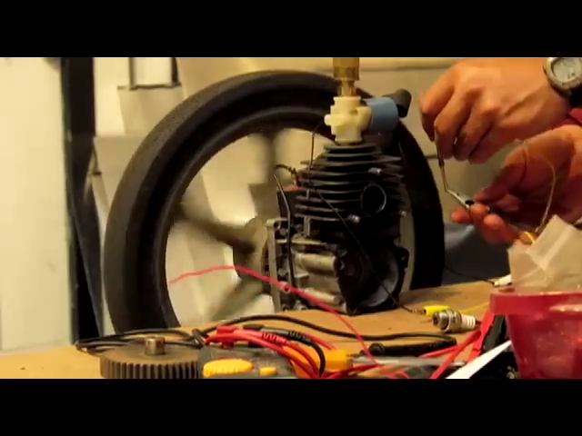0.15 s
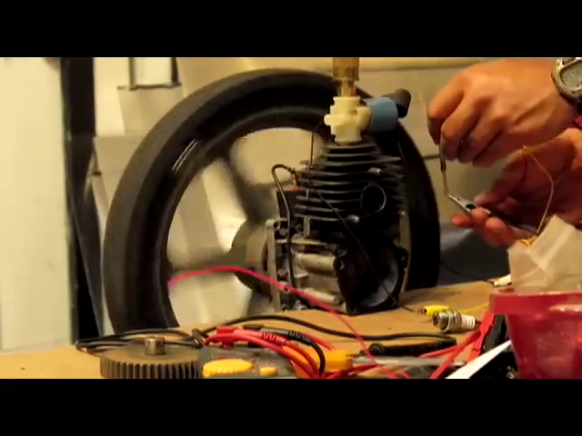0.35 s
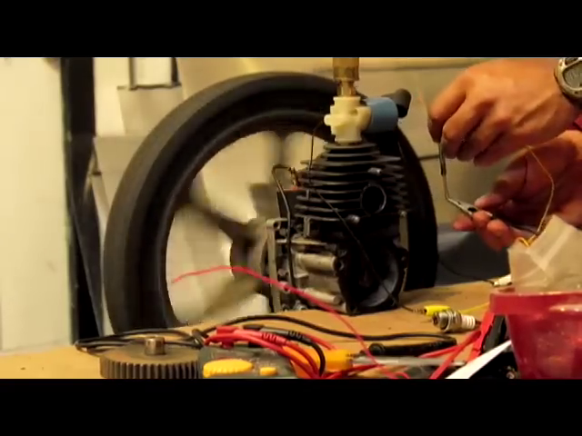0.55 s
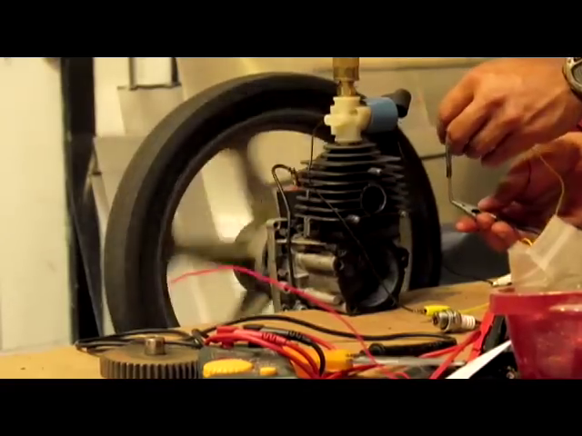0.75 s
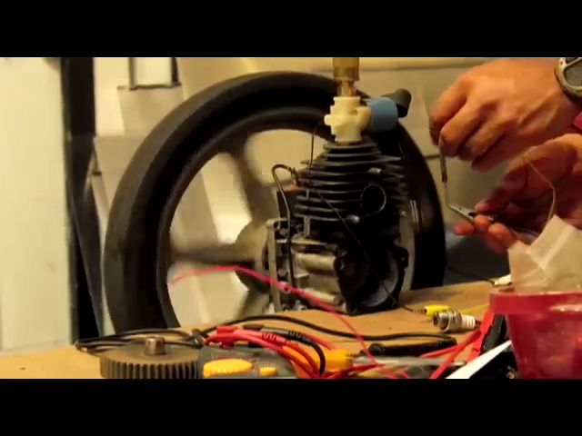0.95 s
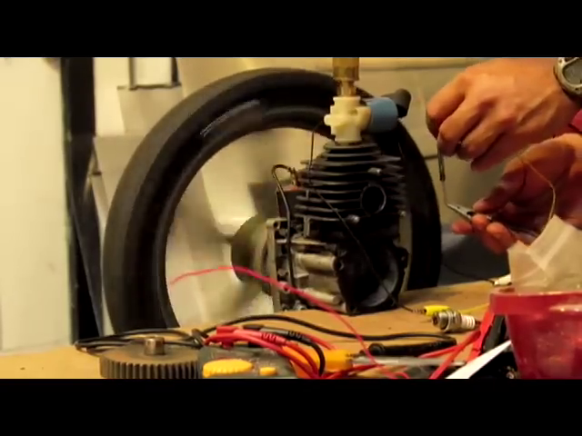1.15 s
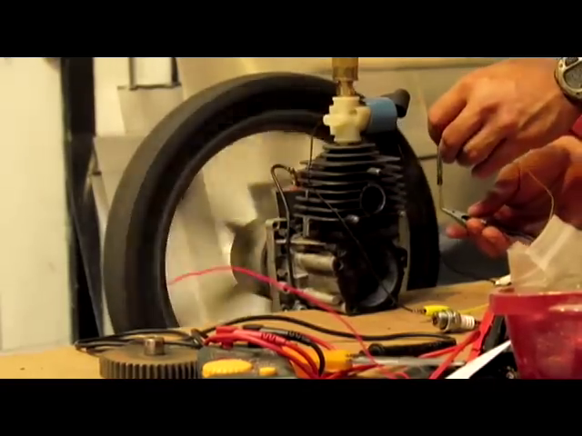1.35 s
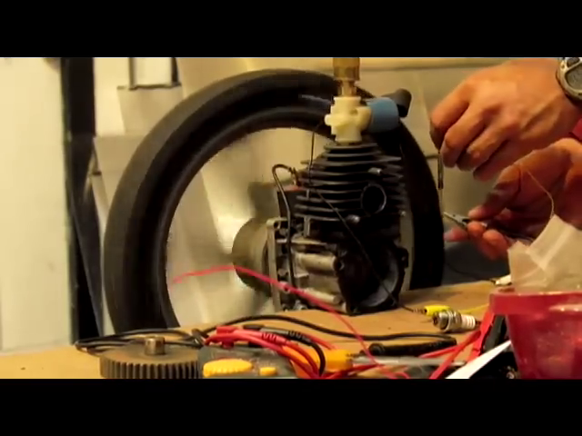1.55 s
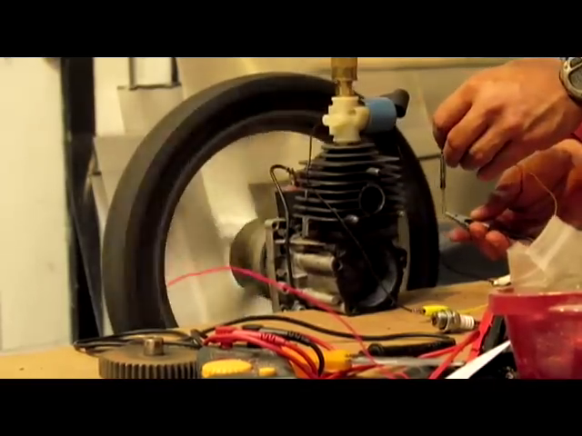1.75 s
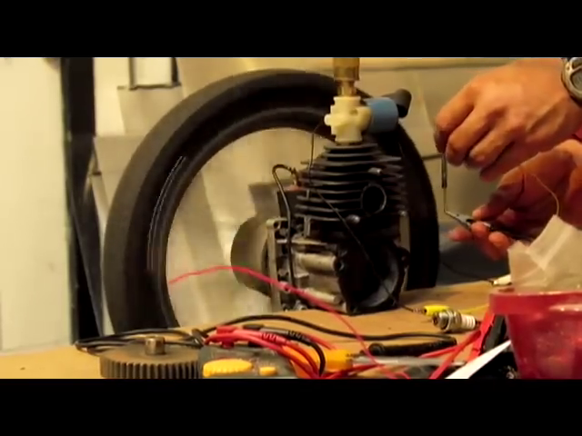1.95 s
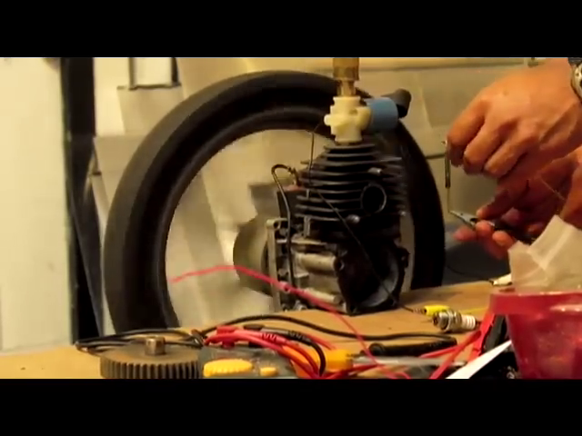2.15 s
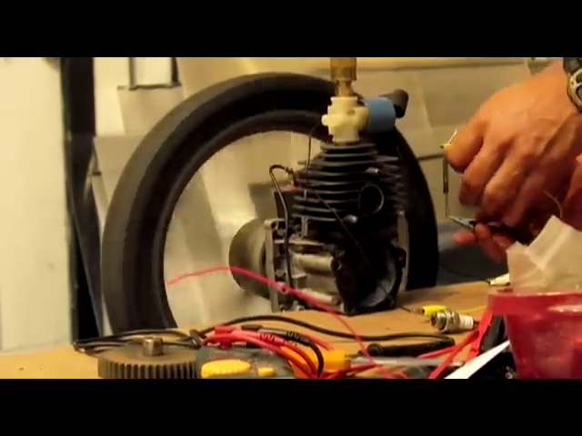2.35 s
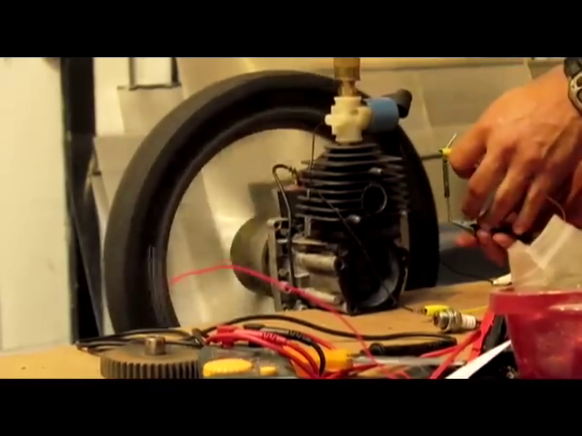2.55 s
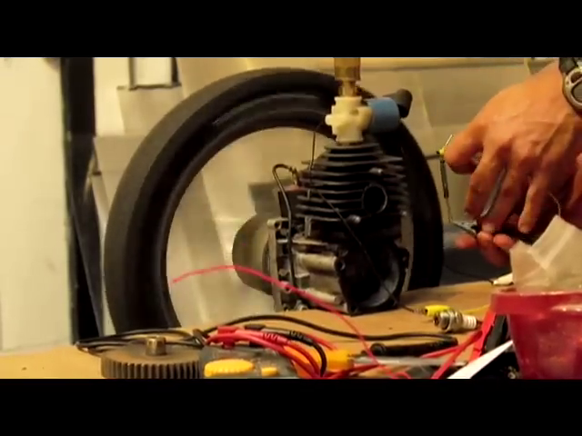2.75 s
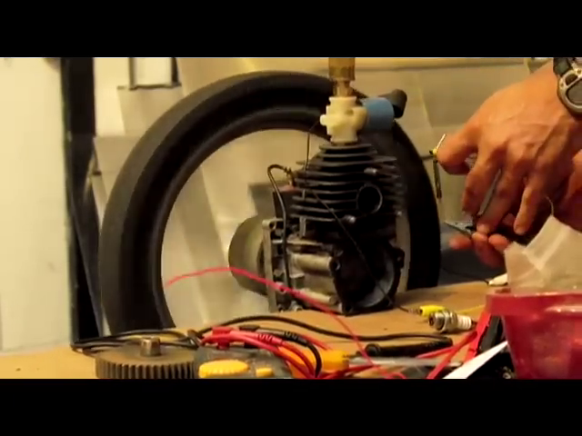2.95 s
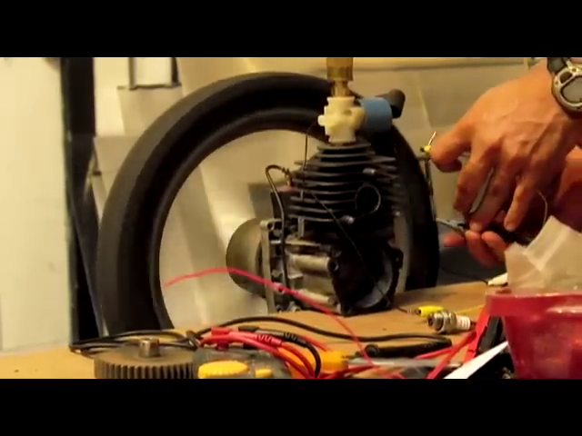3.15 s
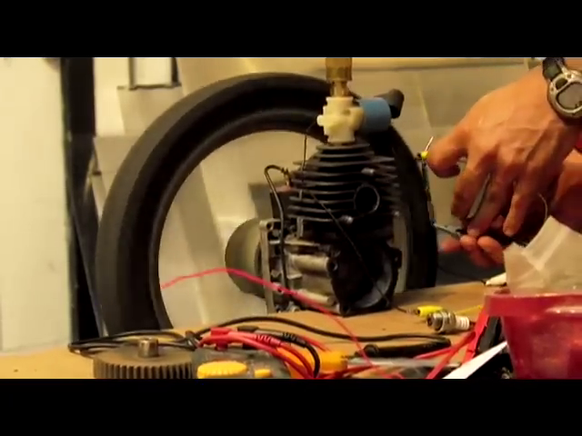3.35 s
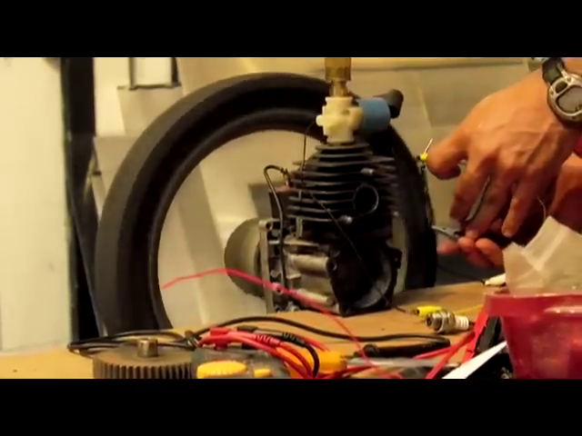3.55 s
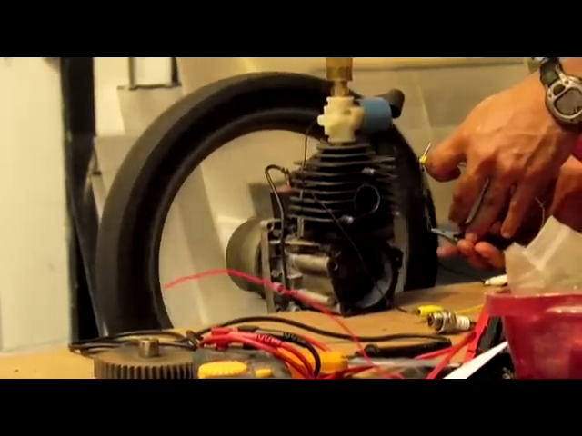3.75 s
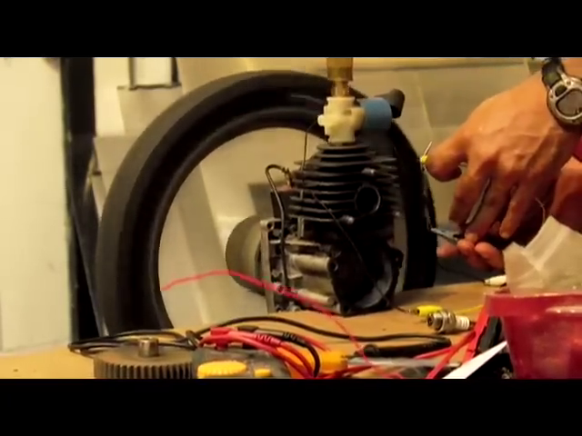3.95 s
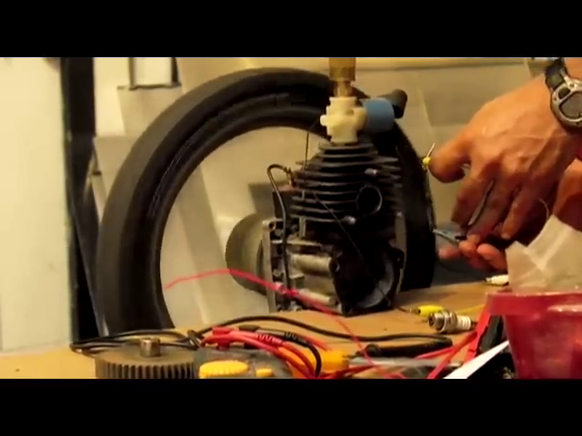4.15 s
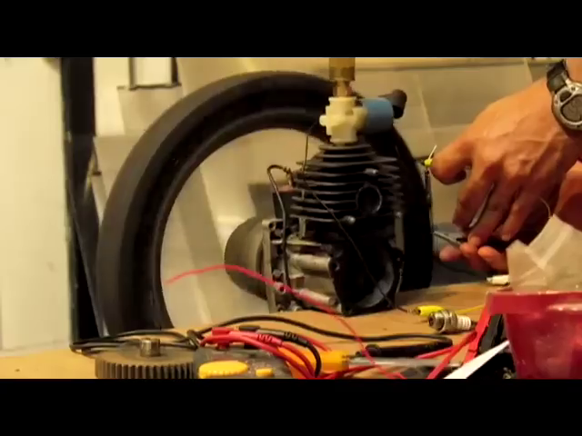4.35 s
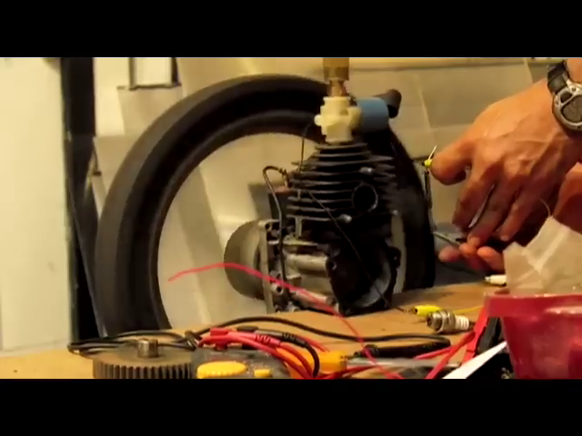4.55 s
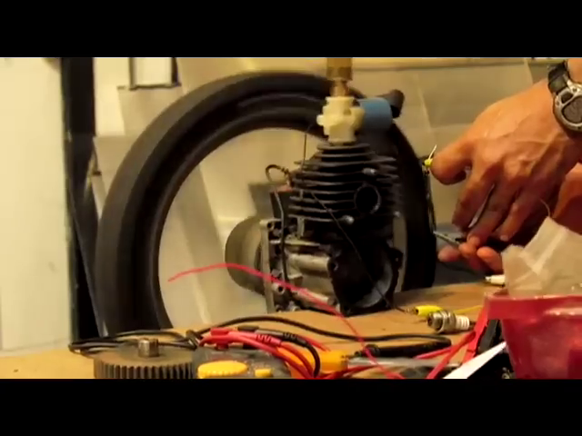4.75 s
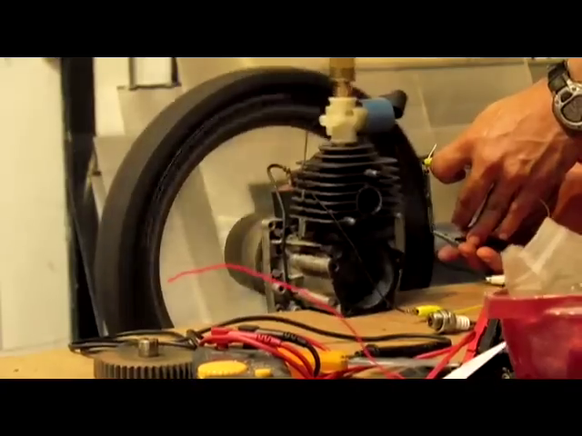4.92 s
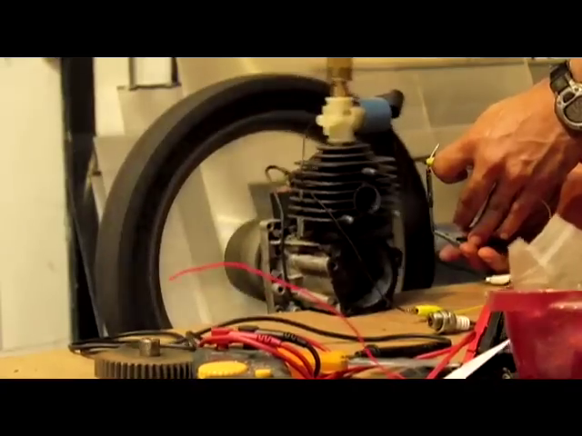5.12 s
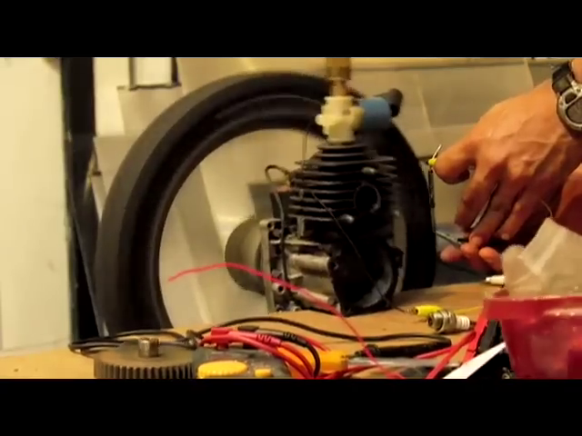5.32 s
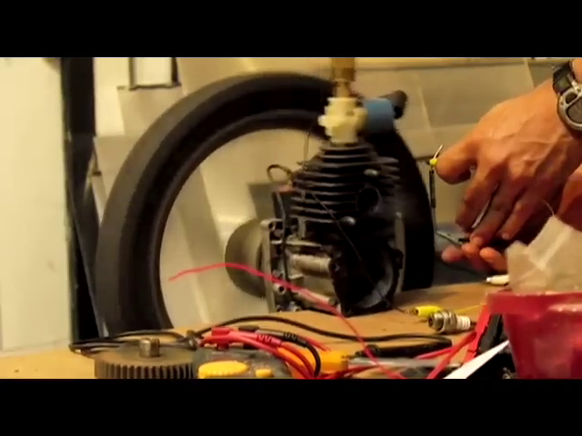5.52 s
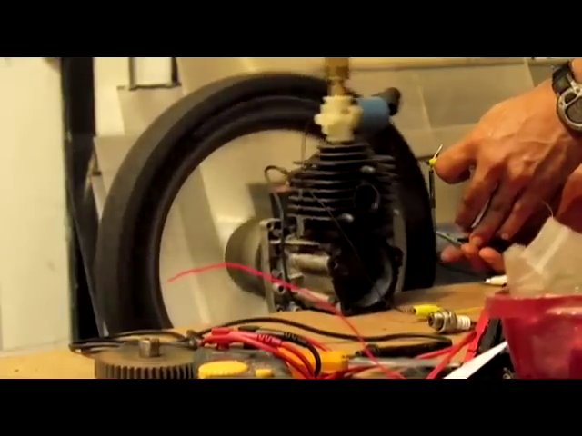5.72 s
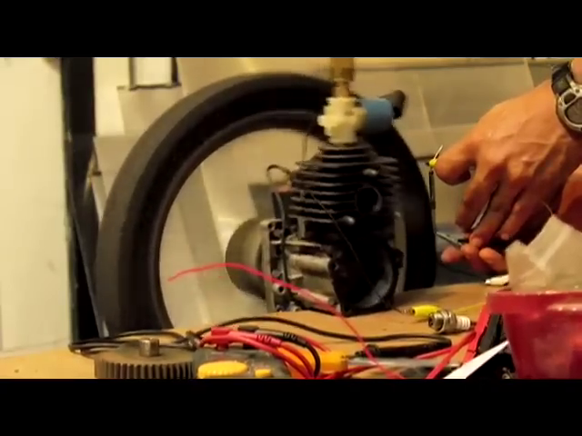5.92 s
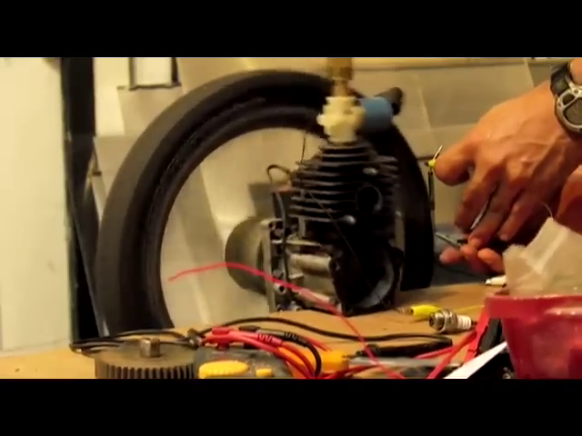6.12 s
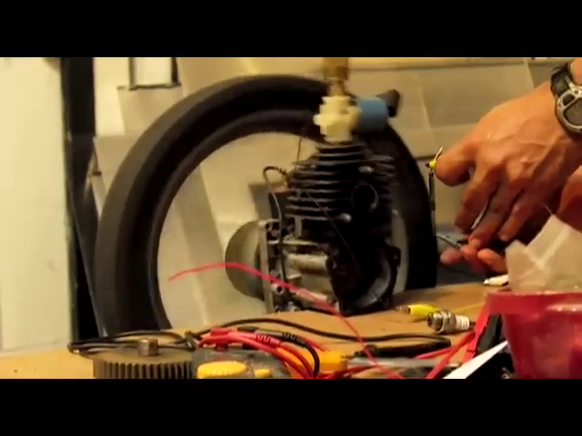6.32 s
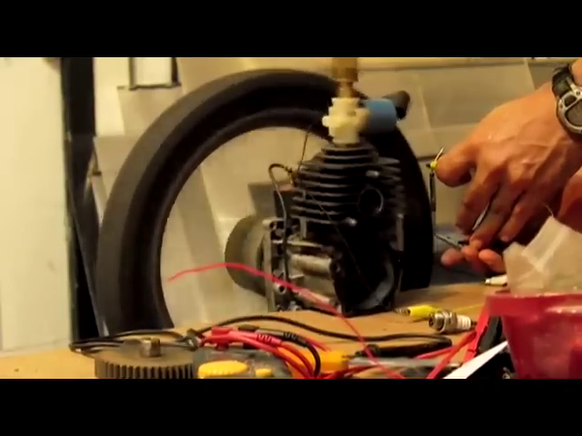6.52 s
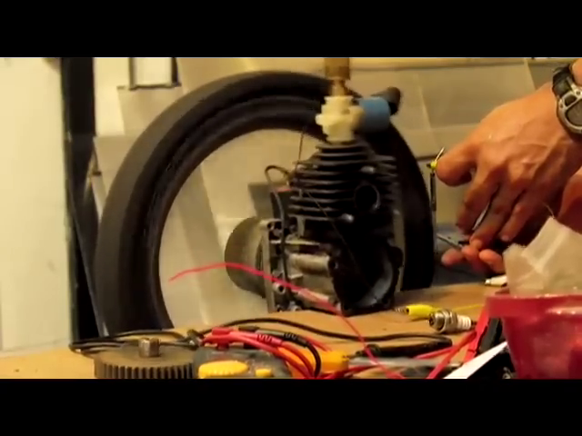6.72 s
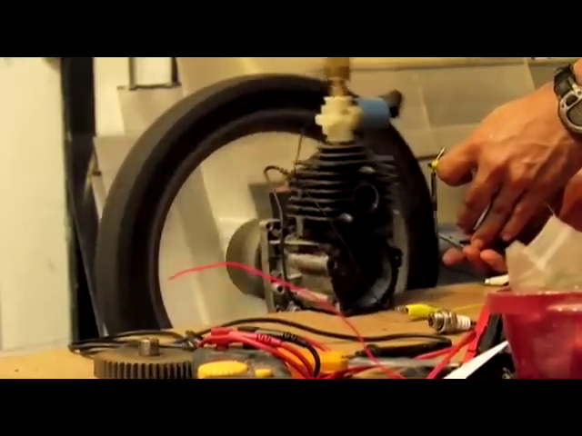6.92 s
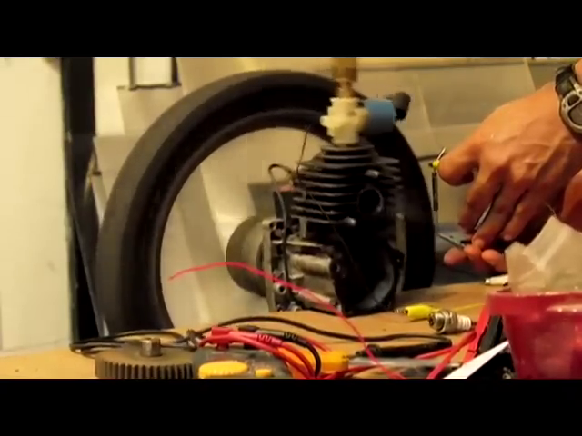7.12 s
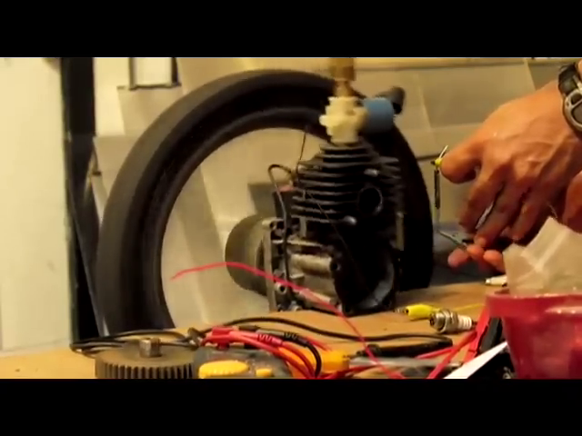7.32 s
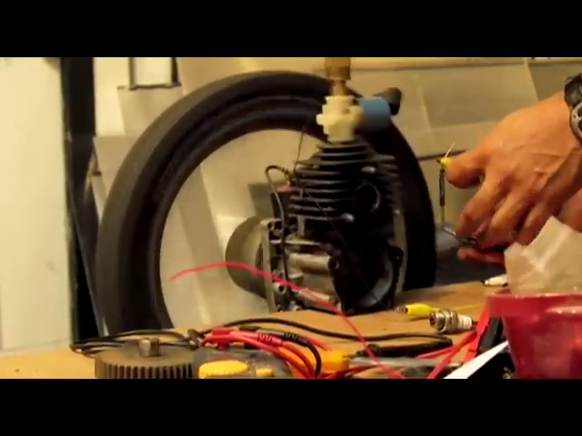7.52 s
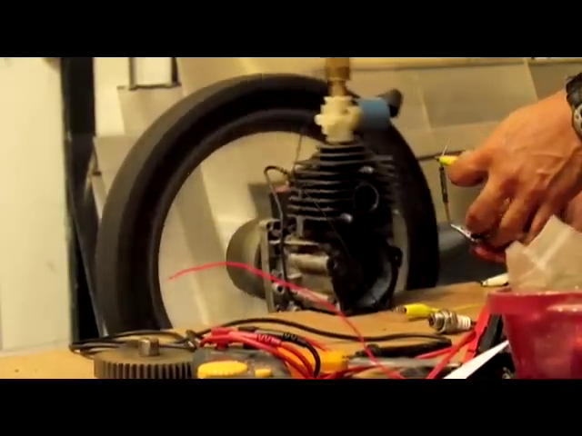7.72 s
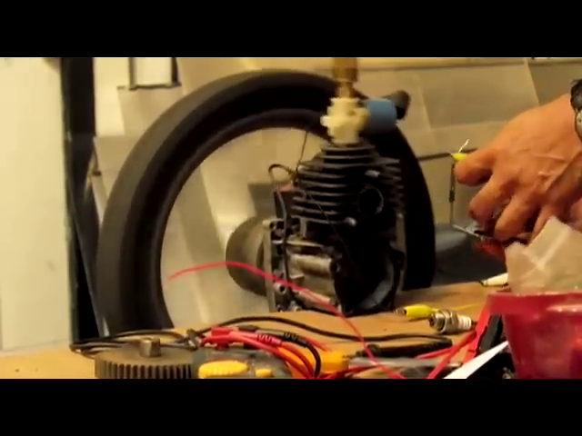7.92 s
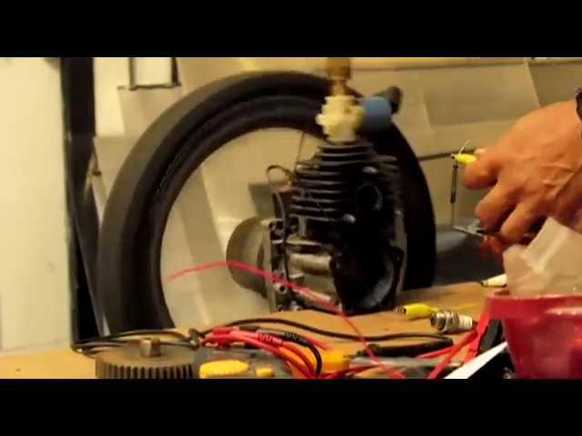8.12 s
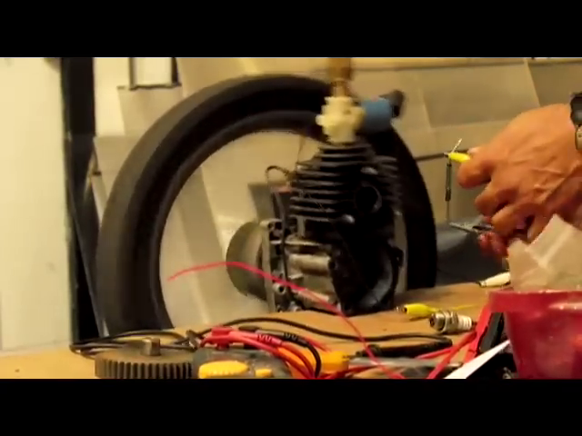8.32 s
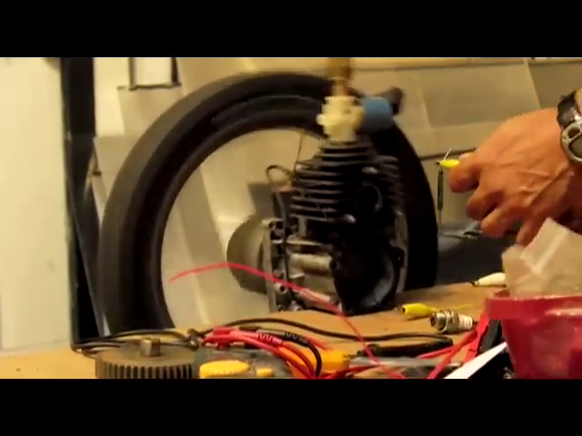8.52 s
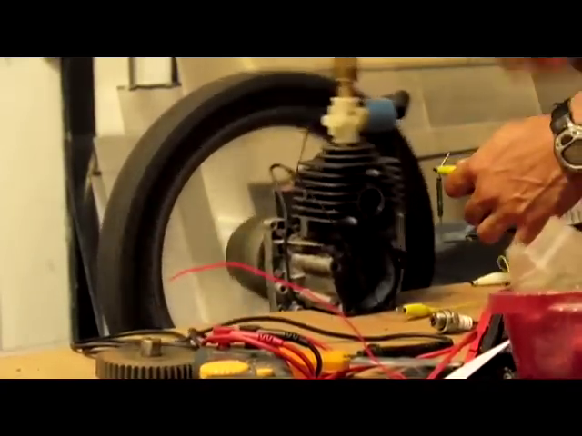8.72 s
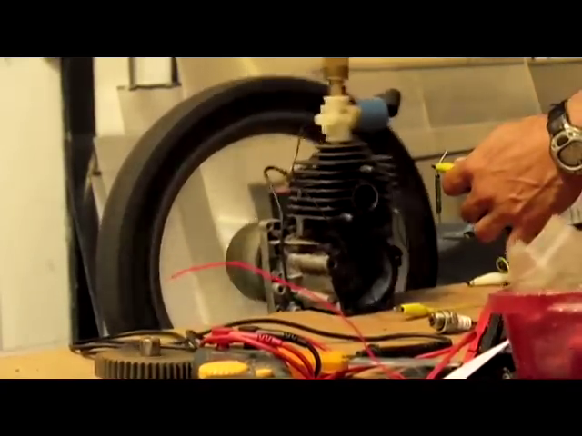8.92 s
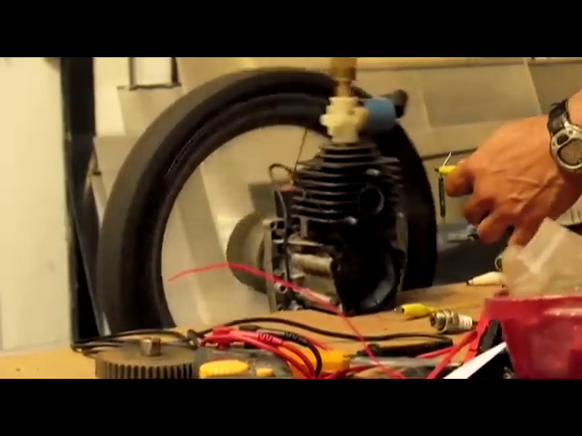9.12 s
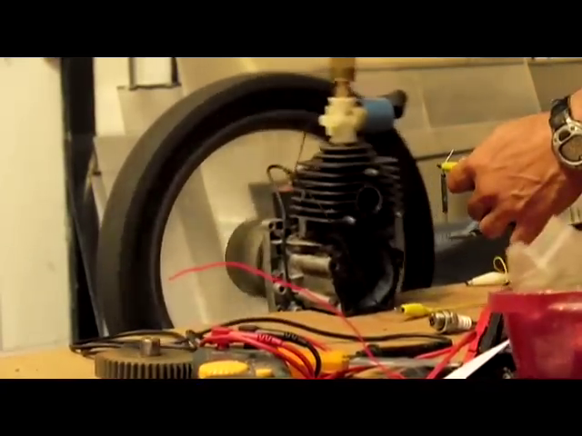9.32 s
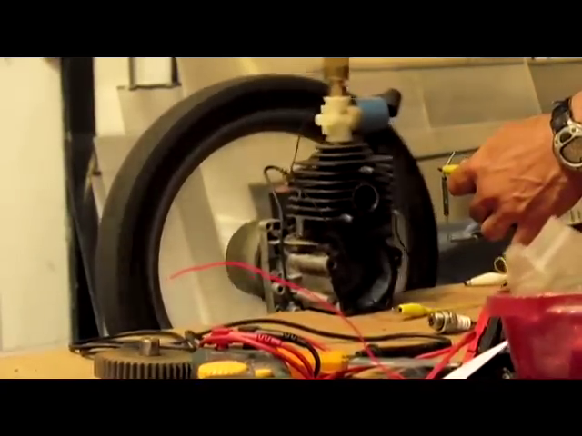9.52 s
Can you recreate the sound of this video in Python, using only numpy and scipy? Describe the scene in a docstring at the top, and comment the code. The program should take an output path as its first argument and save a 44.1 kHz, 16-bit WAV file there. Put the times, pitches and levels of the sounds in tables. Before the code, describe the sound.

Sharp, hissy chuffs and valve clicks from a small air-driven engine quicken steadily, then weaken, slow and briefly pop again.

```python
"""A small two-stroke compressed-air engine on a workshop bench, close to a camera's stereo microphone.
First a little air escapes over the hum of the room. Then, on each turn, a solenoid valve clacks and
feeds the cylinder, air leaks past the piston, and the exhaust port opens with a pop and a blast.
The engine gathers speed until 7.5 s, then runs short of air and slows, the port only sucking.
Around 9 s it pops strongly again for a few turns, and at the end it sucks once more."""
import sys
import numpy as np
from scipy import signal
from scipy.fft import rfft, irfft, next_fast_len
from scipy.io import wavfile
from scipy.ndimage import uniform_filter1d

SR = 44100
rng = np.random.default_rng(int(sys.argv[2]) if len(sys.argv) > 2 else 0)


def output_pcm(signal):
    """Save a mono or channel-first signal as 16-bit PCM at the path in sys.argv[1].

    Samples are clipped to [-1, 1] before scaling.
    """
    pcm = np.clip(np.atleast_2d(signal).T, -1, 1) * 32767
    wavfile.write(sys.argv[1], SR, np.round(pcm).astype(np.int16))


N = 426447
TIME = np.arange(N) / SR

# Levels in the tables are relative; each source sets its own gain.
# flywheel (time [s], speed [turns/s])
FLYWHEEL_SPEED = [(1.2028, 1.806), (1.5, 2.349), (1.95, 3.391), (2.35, 3.407), (2.55, 3.57), (3.4, 4.883),
                  (4.4, 6.303), (5.25, 7.246), (5.9, 7.797), (6.75, 8.409), (7.4, 8.82), (7.5, 9.109),
                  (8.05, 8.058), (8.6, 6.839), (8.75, 6.111), (8.85, 7.382), (8.95, 6.632), (9.25, 7.136),
                  (9.67, 6.164)]
# charge as the port opens (time [s], pop size [linear, negative for suction], air level [dB])
CYLINDER_CHARGE = [(1.2, 0.074, -38), (1.65, 0.12, -28), (1.98, 0.14, -34.5), (2.27, 0.11, -42),
                   (2.559, 0.15, -32.5), (3.06, 0.19, -30.5), (4.1, 0.22, -30.5), (5.1, 0.22, -32.5),
                   (6.25, 0.29, -32.5), (6.8, 0.24, -32.5), (7.3, 0.26, -31), (7.48, 0.21, -35.5),
                   (7.59, 0.16, -47), (7.7, 0.07, -56), (7.82, -0.16, -50.5), (8.46, -0.15, -52.5),
                   (8.6, -0.068, -57), (8.755, -0.032, -43), (8.9, 0.29, -30.5), (9.191, 0.29, -29),
                   (9.33, 0.052, -62), (9.48, -0.14, -59), (9.64, -0.11, -50)]
# ringing parts (frequency [Hz], level [dB], time to fall 60 dB [s])
ENGINE_BENCH_MODES = [(77, -29, 0.065), (137, -38, 0.12), (167.2, 2, 0.14), (202, 8.5, 0.032),
                      (272, 8, 0.029), (338, -7, 0.085), (468, -14, 0.19), (505.8, 0.5, 0.12),
                      (569, 2.5, 0.07), (613, -7, 0.17), (670, -4, 0.11), (716, 6.5, 0.05),
                      (887, 19, 0.019), (1115, 2, 0.047), (1103, 3, 0.0065)]
WHEEL_MODES = [(800, -4, .08), (827, 1, .2), (856, -5, .07)]
SOLENOID_MODES = [(866, -4, 0.022), (976, 5.5, 0.01), (1010, 5, 0.018), (1130, 3, 0.018),
                  (1220, -5.5, 0.0086), (1410, -1.5, 0.0096), (2060, -4.5, 0.009), (2284, 7.5, 0.0048),
                  (3503, 3, 0.0034), (4108, -9.5, 0.0082), (5130, -1, 0.008)]
# resonances of port and fins (frequency [Hz], width [Hz], level [dB])
PORT_RESONANCES = [(3192, 170, 10), (3610, 66, -0.5), (3430, 68, -8), (3670, 140, 11), (3940, 37, 13.5),
                   (4310, 40, 6.5), (4620, 69, 12.5), (5350, 98, 17)]
# whistle at the port edge on suction (time [s], level [dB])
SUCTION_LEVELS = [(7.82, -36), (7.94, -25), (8.06, -43), (8.19, -33), (8.32, -30), (8.46, -24), (8.6, -28),
                  (9.48, -24), (9.64, -27)]
# valve stroke before each port opening (opening time [s], clack level [dB], feed level [dB])
VALVE_LEVELS = [(1.2, -6.5, -28.5), (1.65, -8.5, -26), (1.98, -14, -28), (2.27, -11, -30),
                (2.56, -15.5, -27.5), (3.3, -21.5, -28), (4.0, -21.5, -30.5), (5.1, -28, -34.5),
                (6.1, -24, -30), (6.6, -22, -35), (7.59, -30, -33.5), (7.7, -23.5, -52), (7.82, -20, -40.5),
                (7.94, -21.5, -44), (8.06, -19, -43), (8.19, -15.5, -41), (8.32, -17, -40),
                (8.46, -17, -45), (8.6, -23.5, -47), (8.755, -19, -51), (8.9, -14.5, -25.5),
                (9.05, -20.5, -33), (9.19, -19, -28), (9.33, -27, -60), (9.48, -20, -44),
                (9.64, -17.5, -62)]
# how early the valve strikes (opening time [s], advance [turns])
VALVE_ADVANCE = [(1.2028, .3248), (1.65, .259), (1.98, .269), (2.27, .265), (2.56, .269), (2.82, .275),
                 (3.3, .272), (3.7, .281), (7.59, .282), (7.7, .254), (7.82, .2), (7.94, .226),
                 (8.46, .236), (8.6, .11), (8.755, .274), (8.9, .283), (9.05, .278), (9.33, .274),
                 (9.48, .221), (9.64, .178)]
# extra valve strikes in mid-stroke (time [s], clack level [dB], feed level [dB])
VALVE_RESTRIKES = [(8.7221, -7.5, -37), (9.601, -19.5, -45)]
# leak past the piston rings (position after the opening [turns], level [dB])
LEAK_CYCLE = [(.4, -54), (.52, -43), (.57, -41), (.66, -42), (.8, -53), (.97, -56), (1, -68)]
# air escaping before the first stroke (time [s], level [dB])
ESCAPE_LEVELS = [(0.0, -47.5), (0.038, -49.5), (0.172, -52), (0.274, -68.5), (0.362, -84), (0.756, -81),
                 (0.796, -71), (0.834, -87), (1.0, -87.5)]
# noise spectra, each named for its source (frequency [Hz], density [dB])
BLAST_SPECTRUM = [(150, -23), (500, 10.5), (2000, -2), (3700, -8), (5400, 0), (7000, 7.5), (11000, 6.5),
                  (16000, 18)]
BLOWDOWN_SPECTRUM = [(300, -27), (900, 0), (2000, 9), (3000, 1.5), (3700, -8.5), (4400, 8.5), (5600, -11),
                     (7000, -8), (11000, 12.5), (16000, -32)]
SUCTION_SPECTRUM = [(1500, -22), (1880, -6), (1990, 6), (2100, -16), (2600, -46)]
FEED_SPECTRUM = [(500, -63), (1500, 20.5), (2500, 13.5), (3600, 7), (4450, 9.5), (4600, 22), (4750, 10),
                 (7000, 24.5), (11000, 22), (16000, 38.5)]
LEAK_SPECTRUM = [(1000, 0), (4000, 1), (7000, 14), (11000, 17), (16000, 25)]
ESCAPE_SPECTRUM = [(1000, 11), (3000, -4), (3700, -8), (4550, 6), (5400, 4), (7000, 8.5), (11000, 13),
                   (16000, 17)]
BEARING_SPECTRUM = [(150, -30), (400, -10), (760, 34), (835, 28), (900, 2), (1500, -27), (2500, 27),
                    (4000, -31.5), (5500, 19), (7500, -21), (14000, -26)]
ROOM_SPECTRUM = [(15, -40), (28, -22), (65, 7.5), (100, 0.5), (200, 1), (420, -0.5), (900, -7.5),
                 (1800, -21), (3500, -45), (8000, -60), (16000, -82)]
RUMBLE_SPECTRUM = [(12, -27), (25, 23.5), (45, 33), (90, -39.5)]
# mains hum (frequency [Hz], level [dB])
MAINS_HUM = [(119.6, -45.5), (239.5, -58.5)]
# swells of rumble on the left of the microphone (time [s], rise [dB])
RUMBLE_SWELLS = [(.08, 17), (1.13, 25), (2.38, 19), (3.95, 14)]
# reflections off the bench and near walls (delay [s], level [dB])
NEAR_ECHOES = [(.0048, -14), (.0095, -11), (.0156, -14), (.0229, -13), (.029, -16), (.0337, -16),
               (.0602, -17)]
# workshop reverberation (frequency [Hz], time to fall 60 dB [s])
ROOM_DECAY = [(150, 0.53), (800, 0.31), (4000, 0.046), (12000, 0.19)]
# microphone in its housing (frequency [Hz], gain [dB])
MIC_RESPONSE = [(30, -13.5), (1000, 1.5), (2400, 8), (2820, -0.5), (3250, 16), (3800, 20), (4700, 2.5),
                (5000, -2), (5400, 1), (7400, -17.5), (9000, -11), (10200, 1.5), (12000, -4),
                (15000, -36.5)]
# stereo width (frequency [Hz], side gain [dB])
SIDE_GAIN = [(60, -36), (110, -17), (200, -18.5), (380, -11.5), (700, -5), (1290, 1.5), (2380, 9.5),
             (4400, 8.5), (8120, 10), (15000, 12)]
# microphone balance (frequency [Hz], left minus right [dB])
MIC_BALANCE = [(100, -2.5), (500, 0.5), (1200, 0.5), (2400, -3), (4200, -0.5), (8100, 0), (10500, -5),
               (13000, 0.5)]

POP_SCATTER_DB, AIR_SCATTER_DB, CLACK_SCATTER_DB = .4, 1.3, 1.2  # stroke to stroke
RING_SCATTER_DB, PORT_SCATTER_DB = 1.5, 3
RING_DRIFT, PORT_DRIFT = .0051, .012  # share of pitch, stroke to stroke
FIRST_TURN_S, LAST_TURN_S = .6, .154  # before the first and after the last port opening
SHRILL_S, SHRILL_DB = 1.65, 12  # one slow, full stroke on which the top port resonance sings


def exhaust():
    """The exhaust port, close up: each opening gives a pop and a rush of air, and the room answers."""
    ports, periods = openings()
    leads = .0061 + .029 * periods  # a slower piston uncovers the port earlier
    sizes, air_db = at(CYLINDER_CHARGE, ports)
    pop_luck, hiss_luck, blast_luck = rng.standard_normal((len(ports), 3)).T
    sizes = sizes * amp(POP_SCATTER_DB * pop_luck)
    pop = pops(ports, periods, leads, sizes)
    rush = blast(ports, leads, sizes, air_db + AIR_SCATTER_DB * blast_luck)
    rush += blowdown(ports, periods, leads, air_db + AIR_SCATTER_DB * hiss_luck)
    rush += suction(ports, leads, sizes)
    pop = pop + sum(amp(db) * np.roll(pop, round(s * SR), axis=1) for s, db in NEAR_ECHOES)
    return pop + amp(-17) * walls(pop) + rush + amp(-15.5) * walls(rush)


def pops(ports, periods, leads, sizes):
    """Pressure pulses ring engine and bench; the wheel rings harder the faster it is driven."""
    pulses, body, wheel = np.zeros((3, N))
    for s, period, lead, size in zip(ports, periods, leads, sizes):
        pulse = size * pressure_pulse(lead, charged=size > 0)
        add(pulses, s - lead, pulse)
        detune = [1 + RING_DRIFT * rng.normal(), 1, 1]
        body_ring = ring(np.multiply(ENGINE_BENCH_MODES, detune), RING_SCATTER_DB, attack_s=.000098)
        add(body, s - lead, signal.fftconvolve(pulse, body_ring))
        drive = max(size, 0) * amp(-19) / (8 * period) ** 1.34
        add(wheel, s, drive * ring(np.multiply(WHEEL_MODES, detune), RING_SCATTER_DB, attack_s=.003))
    mid = pulses + amp(-47) * body + wheel
    side = np.roll(amp(-46) * body + wheel, 17)  # the ringing reaches the sides a little later
    return np.array([mid, side])


def pressure_pulse(lead, charged):
    """Pressure at the port swells and snaps back; without a charge there is only a short lead-in."""
    age = TIME[:SR // 2]
    t = age - lead
    snap = .56 * bump(t - .001, .00032) - bump(t, .0002)
    if not charged:
        return .36 * bump(t + .0028, .0006) + snap
    onset = .39 * bump(t + .978 * lead, .00019) - .26 * bump(t + .61 * lead, .001)
    push = .52 * bump(t + .0026, .00059) + .041 * bump(t + .13 * lead, .33 * lead)
    backswing = -.019 * bump(t - .5 * lead, .88 * lead)
    bench_kick = .021 * np.sin(2 * np.pi * 85 * age) * amp(-60 * age / .033)
    return onset + push + snap + backswing + bench_kick


def blast(ports, leads, sizes, levels_db):
    """A charge leaves as a turbulent jet that trails off; suction makes one short puff."""
    envelope = np.zeros(N)
    for s, lead, size, db in zip(ports, leads, sizes, levels_db):
        t = TIME[:SR // 2] - lead
        if size > 0:
            gust = .4 * bump(t + .74 * lead, .1 * lead) + .7 * bump(t + .3 * lead, .26 * lead)
            trail = .13 * (t > 0) * amp(-60 * t / .12)
            add(envelope, s - lead, amp(db + 3.5) * (gust + trail))
        else:
            add(envelope, s - lead, amp(db + .5) * .8 * bump(t + .0012, .0021))
    return envelope * air(BLAST_SPECTRUM, 9000, 13000, patchy_db=1.5)


def blowdown(ports, periods, leads, levels_db, hold_turns=.085):
    """The cylinder empties with a ringing hiss that surges, holds briefly and dies away."""
    envelope = np.zeros(N)
    for s, period, lead, db in zip(ports, periods, leads, levels_db):
        t = TIME[:SR // 2] - lead
        rise = np.clip(1.4 + 2.1 * t / lead, 0, 1) ** 2
        surge = rise - .4 * bump(t - .001, .0015) + .4 * bump(t - .007, .003)
        decay_db = 60 * np.clip(t - hold_turns * period, 0, 1) / (.34 + .15 * period)
        add(envelope, s - lead, amp(db - 5.5 - decay_db) * surge)
    return envelope * port_resonance(air(BLOWDOWN_SPECTRUM, 3000, 5000, patchy_db=1.5), ports)


def port_resonance(hiss, ports):
    """Port and fins ring in the hiss, at new strengths and pitches on each stroke."""
    hz, t, spectra = signal.stft(hiss, SR, nperseg=1024)
    stroke = np.clip(np.searchsorted(ports, t + .02) - 1, 0, None)
    luck = rng.standard_normal((len(ports), 2, len(PORT_RESONANCES)))[stroke]
    lift_db, detune = PORT_SCATTER_DB * luck[:, 0], 1 + PORT_DRIFT * luck[:, 1]
    lift_db[:, -1] += SHRILL_DB * (abs(t - SHRILL_S - 1 / 8) < 1 / 6)
    gain = 1
    for k, (centre, width, db) in enumerate(PORT_RESONANCES):
        offset = 2 * (hz[:, None] - centre * detune[:, k]) / width
        gain = gain + amp(db + lift_db[:, k]) / (1 + offset ** 2)
    gain /= np.sqrt(np.mean(gain[(hz > 3000) & (hz < 5000)] ** 2, axis=0))
    return signal.istft(spectra * gain, SR, nperseg=1024)[1][:, :N]


def suction(ports, leads, sizes):
    """An unfed cylinder draws air back in, with a breathy whistle at the port edge."""
    envelope, t = np.zeros(N), TIME[:SR // 2]
    gulp = amp(-60 * t / .26) * np.clip(t / .005, 0, 1)
    for s, lead, size, db in zip(ports, leads, sizes, *at(SUCTION_LEVELS, ports)):
        if size <= 0:
            add(envelope, s - lead, size * amp(db) * gulp)
    return envelope * air(SUCTION_SPECTRUM, 1500, 2600, patchy_db=.75)


def valve():
    """The solenoid clacks; air then rushes into the cylinder until the port opens."""
    clacks, feed = np.zeros((2, N)), np.zeros(N)
    ports, periods = openings()
    advance, clacks_db, feeds_db = at(VALVE_ADVANCE, ports) + at(VALVE_LEVELS, ports)
    quick = periods < 1 / 4  # at speed the plunger lands less evenly
    clacks_db = clacks_db + CLACK_SCATTER_DB * quick * rng.standard_normal(len(ports))
    strikes = list(zip(ports - advance * periods, clacks_db, feeds_db)) + VALVE_RESTRIKES
    for s, clack_db, feed_db in strikes:
        add(clacks, s, amp([[clack_db - 7], [clack_db - 14]]) * plunger())
        open_s = ports[ports > s][0] - s
        t = TIME[:round((open_s + .1) * SR)]
        shutoff_db = 60 * np.clip(t - open_s, 0, 1) / .027
        add(feed, s, amp(feed_db - 16 - shutoff_db) * (1 - np.exp(-t / .0018)))
    sound = clacks + feed * air(FEED_SPECTRUM, 9000, 13000, patchy_db=1.5)
    return sound + amp(-2) * walls(sound)


def plunger():
    """The plunger lands and bounces on its stop, ringing the solenoid."""
    bounces = amp(-60 * TIME[:SR // 20] / .016) * rng.standard_normal((2, SR // 20)) ** 3
    bounces[:, 0] = 7  # first landing
    metal = ring(SOLENOID_MODES, spread_db=.78, attack_s=.00029)
    knock = signal.fftconvolve(bounces, metal[None], axes=1)
    return knock / abs(knock).max(axis=1, keepdims=True)


def leaks(turns, unfed_db=-7):
    """Air escapes at the start, then seeps past the rings on each upstroke, less without a charge."""
    fade_in = np.clip(.71 * TIME - .6, .03, 1)
    unfed = at(CYLINDER_CHARGE, TIME)[0] < 0
    squeeze = fade_in * amp(at(LEAK_CYCLE, turns % 1)[0] - 16.5 + unfed_db * unfed)
    escape = amp(np.interp(TIME, *np.transpose(ESCAPE_LEVELS), right=-120))
    sound = squeeze * air(LEAK_SPECTRUM, 10100, 10450, patchy_db=3)
    sound += escape * air(ESCAPE_SPECTRUM, 10050, 10500, patchy_db=1.1)
    return sound + amp(-1) * walls(sound)


def bearings(turns):
    """Bearings and wheel rush louder with speed."""
    speed = uniform_filter1d(np.gradient(turns) * SR, SR // 4)
    return amp(-78) * speed ** 1.08 * air(BEARING_SPECTRUM, 150, 14000, patchy_db=3.5)


def room_tone():
    """Behind the engine, the steady rush of the workshop and a mains hum."""
    hum = sum(amp(db) * np.sqrt(2) * np.sin(2 * np.pi * hz * TIME) for hz, db in MAINS_HUM)
    return amp(-40) * air(ROOM_SPECTRUM, 20, 16000, patchy_db=2.3) + hum


def rumble():
    """Low rumble, unrelated on the two sides of the microphone, with dull swells mostly on the left."""
    swell_db = sum(db * bump(TIME - s, .052) for s, db in RUMBLE_SWELLS)
    return amp(-53.5 + swell_db * [[1], [.3]]) * air(RUMBLE_SPECTRUM, 12, 90, patchy_db=4)


def walls(x):
    """The workshop's reverberation: each frequency dies at its own rate."""
    hz, t, spectra = signal.stft(rng.standard_normal((2, SR // 2)), SR, nperseg=256)
    decay = amp(-60 * t / along(ROOM_DECAY, hz)[:, None])
    tail = signal.istft(spectra * decay, SR, nperseg=256)[1]
    delayed = np.pad(x, ((0, 0), (150, 0)))
    return signal.fftconvolve(delayed, tail / np.linalg.norm(tail[0]), axes=1)[:, :N]


def openings():
    """Times at which the port uncovers, once a turn, and the length of the turn before each."""
    s, speed = np.transpose(FLYWHEEL_SPEED)
    turns = np.cumsum(np.interp(TIME, s, speed) * (TIME >= s[0])) / SR
    ports = np.r_[s[0], np.interp(np.arange(1, int(turns[-1]) + 1), turns, TIME)]
    return ports, np.r_[FIRST_TURN_S, np.diff(ports)]


def crank_turns():
    """Crank position in turns, a whole number at each port opening."""
    ports = openings()[0]
    marks = np.r_[.2, ports, ports[-1] + LAST_TURN_S]
    return np.interp(TIME, marks, np.arange(len(marks)))


def air(spectrum, lo_hz, hi_hz, patchy_db):
    """Two unrelated turbulent noises, rms 1 between lo and hi as the microphone hears them."""
    spectra = signal.stft(rng.standard_normal((2, N)), nperseg=256)[2]
    patches = uniform_filter1d(uniform_filter1d(rng.standard_normal(spectra.shape[1:]), 4, 0), 5, 1)
    noise = signal.istft(spectra * amp(patchy_db * patches / patches.std()), nperseg=256)[1][:, :N]
    noise = filtered(noise, lambda hz: amp(along(spectrum, hz)))
    band = filtered(noise[0], lambda hz: amp(along(MIC_RESPONSE, hz)) * (hz > lo_hz) * (hz < hi_hz))
    return noise / band.std()


def ring(modes, spread_db, attack_s):
    """Damped modes, struck at new strengths each time."""
    t = TIME[TIME < 1.5 * np.max(modes, axis=0)[-1]]
    return sum(amp(db + spread_db * rng.normal() - 60 * t / t60) * np.sin(2 * np.pi * hz * t)
               for hz, db, t60 in modes) * (1 - np.exp(-t / attack_s))


def bump(t, width):
    """Bell curve around t = 0."""
    return np.exp(-.5 * (t / width) ** 2)


def amp(db):
    """Gain of a level in dB."""
    return 10 ** (np.asarray(db) / 20)


def at(rows, times):
    """Each column after the first, read at the given times."""
    s, *columns = np.transpose(rows)
    return [np.interp(times, s, column) for column in columns]


def along(points, hz):
    """A curve read on a log frequency axis."""
    frequencies, values = np.transpose(points)
    return np.interp(np.log(hz + 1), np.log(frequencies + 1), values)


def filtered(x, response):
    """x through a frequency response."""
    size = next_fast_len(N + SR // 2)
    return irfft(rfft(x, size) * response(np.fft.rfftfreq(size, 1 / SR)), size)[..., :N]


def add(track, s, sound):
    """Mixes a sound into the track from time s."""
    part = track[..., round(s * SR):][..., :sound.shape[-1]]
    part += sound[..., :part.shape[-1]]


def scene():
    """Engine and room arrive as mid and side: bass in the middle, treble mostly in opposite phase."""
    turns = crank_turns()
    sources = exhaust() + valve() + leaks(turns) + bearings(turns) + room_tone()
    mid, side = filtered(sources, lambda hz: amp([0 * hz, along(SIDE_GAIN, hz)]))
    return np.array([mid + side, mid - side]) + rumble()


def record(dry, ceiling=.75, top_hz=15950):
    """The camera housing colours the treble and leans a little right; the circuit hisses, peaks round."""
    lean_db = lambda hz: along(MIC_BALANCE, hz) / 2 * [[1], [-1]]
    hiss = amp(-59.5) * rng.standard_normal(N) * [[1], [-1]]
    heard = filtered(dry, lambda hz: amp(along(MIC_RESPONSE, hz) + lean_db(hz))) + hiss
    rounded = heard / (1 + abs(heard / ceiling) ** 5) ** (1 / 5)
    return filtered(rounded, lambda hz: hz < top_hz)


dry = scene()
out = record(dry)
output_pcm(out)
```